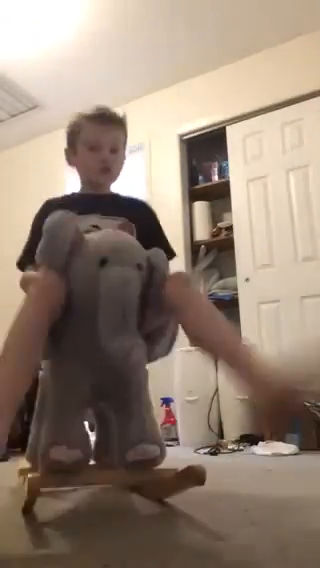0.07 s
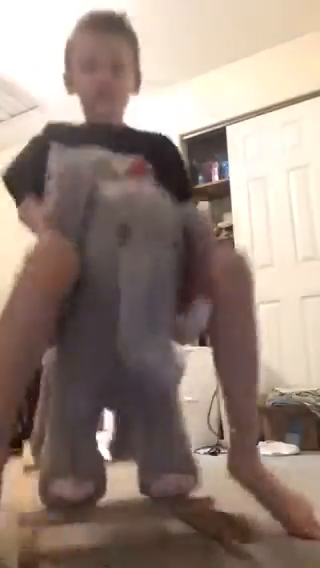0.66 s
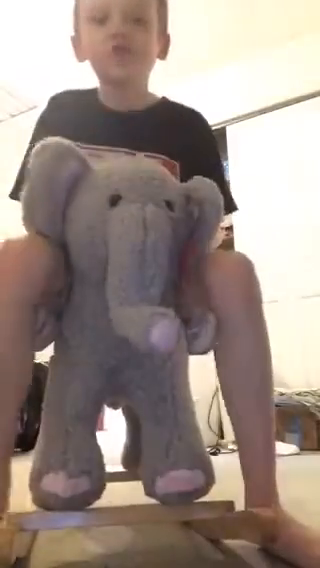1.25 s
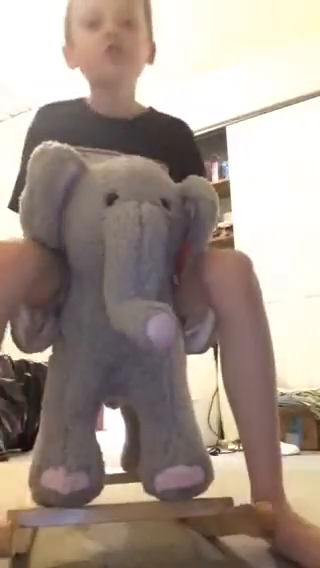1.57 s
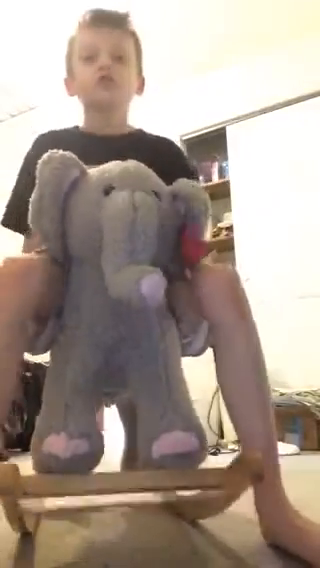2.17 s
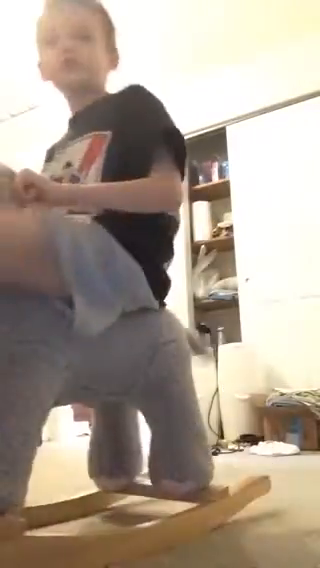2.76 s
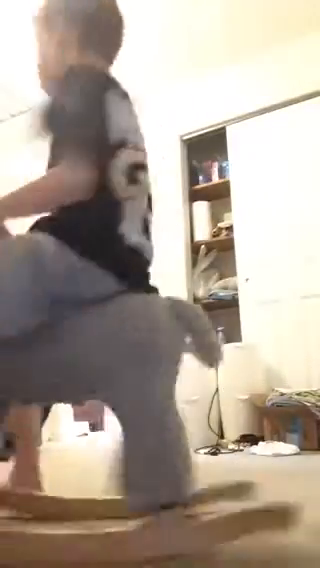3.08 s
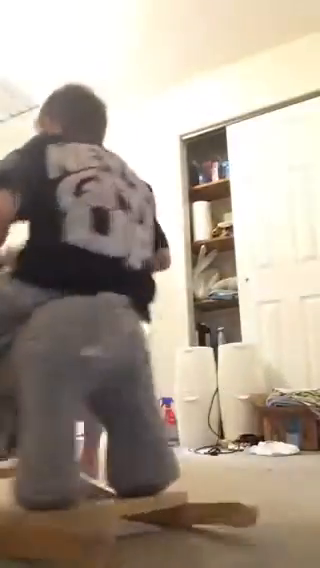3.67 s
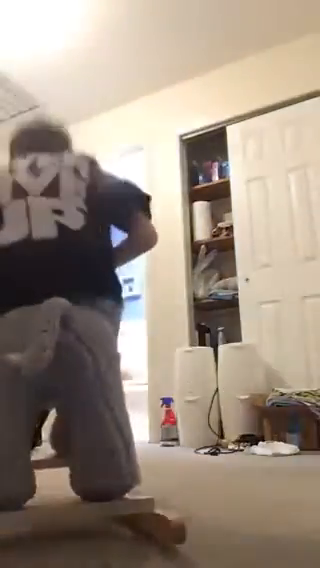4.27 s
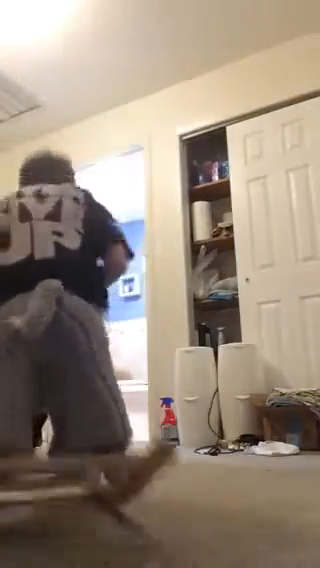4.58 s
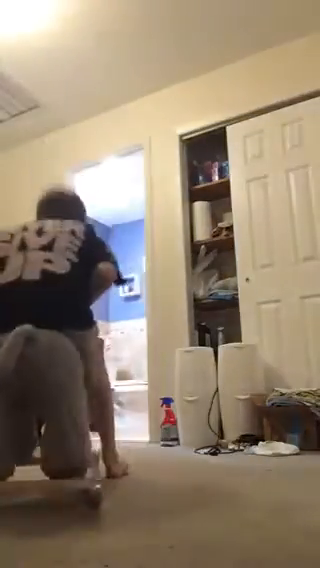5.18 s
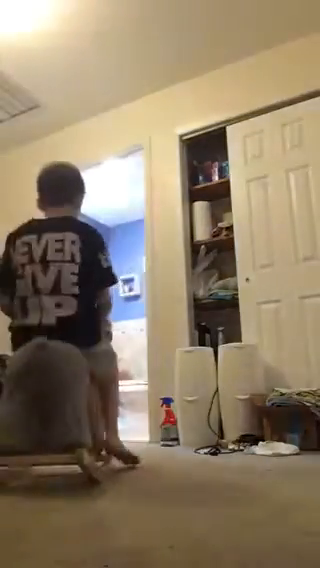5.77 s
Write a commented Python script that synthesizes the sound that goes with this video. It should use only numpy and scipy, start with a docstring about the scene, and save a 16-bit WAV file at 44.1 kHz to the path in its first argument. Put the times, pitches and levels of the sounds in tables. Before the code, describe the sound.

Wooden rockers of a plush ride-on toy thump irregularly on carpet, with soft scraping and cloth swishing in a small room.

```python
"""A small carpeted bedroom, one small microphone close to a child rocking and dragging a plush toy.
Wooden rockers and bare heels thump the floor and knock the toy's frame, and its joints tick.
The runners scrape through the pile; legs and cloth swish past the plush.
Behind them the room answers briefly, over the low rumble of the house."""
import sys
import numpy as np
from scipy import signal
from scipy.fft import rfft, irfft
from scipy.io import wavfile
from scipy.ndimage import uniform_filter1d

SR = 44100
rng = np.random.default_rng(int(sys.argv[2]) if len(sys.argv) > 2 else 0)


def transcribe(signal):
    """Save signal, clipped to [-1, 1], as a 16-bit WAV file at the path in sys.argv[1]."""
    frames = np.atleast_2d(signal).T
    limited = np.clip(frames, -1, 1)
    pcm = np.round(limited * 32767).astype(np.int16)
    wavfile.write(sys.argv[1], SR, pcm)


N = 266452
TIME = np.arange(N) / SR

# Rockers and heels landing: start_s, thud_db, thud_hz, knock_db, clack_db, rebound_gap_s, per_rebound_db
BLOWS = [(.061, -53, 117, -54, -44.5, 0.024, -22), (.383, -27, 68, -47, -65, 0.024, -19),
         (.405, -19, 58.6, -25, -55, .035, -14), (0.4122, -10.5, 95.2, -19, -25.5, 0.046, -13.5),
         (1.052, -43.5, 121, -41, -66, .05, -16), (1.472, -57, 111, -48.5, -72, .016, 0),
         (1.576, -96, 146, -71, -49, 0.01, -28), (1.953, -35, 79, -44.5, -49, 0.017, -5.5),
         (2.368, -72, 110, -44.5, -67, .02, -12), (2.413, -44, 92, -46, -66, 0.027, -6.5),
         (2.587, -24.5, 72.7, -43.5, -25, 0.033, -11.5), (2.817, -39, 82, -45, -52, .06, -23),
         (2.884, -36.5, 66, -63, -68, 0.022, -22), (2.902, -27, 56.6, -74, -77, .042, -18),
         (3.455, -42, 148, -46, -51, 0.048, -13), (5.091, -35.5, 122, -35, -44.5, 0.023, -6.5),
         (5.258, -50, 82.4, -49.5, -55, 0.037, -14), (5.700, -44.5, 205, -51, -47.5, .02, -13),
         (5.964, -38, 117, -37.5, -45.5, 0.032, -3)]
# Modes of the wooden frame, damped by plush and carpet: pitch_hz, relative_db, t60_s
FRAME_MODES = [(166, 3.5, 0.16), (206.6, 8.5, .08), (255, 2, .12), (318, -2.5, 0.16), (467, -4.5, 0.054),
               (495, -20.5, 0.035), (606, -7.5, 0.012), (1057, -31, .025)]
# Rolls and drags of the runners: start_s, length_s, relative_db, fade_db, fizz_offset_db
RUNNER_STROKES = [(0, 0.069, -53.5, 16, -1.5), (0.228, .07, -64.5, 4, -4), (0.487, 0.067, -52.5, 5.5, -9),
                  (0.61, 0.12, -64, 8, 2.5), (0.765, 0.41, -62, 8, -3), (1.326, 0.15, -67, 6.5, -9.5),
                  (2.04, 0.14, -75, 4.5, 1.5), (2.206, 0.3, -65, 3.5, -7.5),
                  (2.518, 0.19, -57.5, 9.5, -1.5), (2.864, 0.24, -62.5, 7.5, -1.5),
                  (3.103, 0.35, -62.5, 8.5, -0.5), (3.484, 0.59, -67.5, 2, -4.5),
                  (4.03, 0.62, -76.5, 0.5, -9), (4.237, 0.19, -67, 12.5, 5.5), (4.648, 0.35, -66.5, 3, 0.5),
                  (5.1, .18, -77, -10.5, -4.5), (5.34, 0.57, -68.5, 4.5, -7.5),
                  (5.87, 0.16, -76.5, -1, -11)]
# Tone of the carpet scrape as heard through the small microphone, with the microphone's treble peaks:
# frequency_hz, gain_db
SCRAPE_AT_MIC_SPECTRUM = [(100, -1.5), (220, 3), (400, 4), (680, 1.5), (950, -2), (1500, -4), (2200, -12),
                          (3250, -7), (4400, -20.5), (6050, -16), (7700, -23), (9000, -13), (10600, -22),
                          (12500, -17), (15500, -38)]
# Legs and cloth sliding on plush:
# start_s, rise_s, length_s, level_db, fade_db, treble_loss_db, resonance_hz, resonance_db, rub_db
SWISHES = [(0, 0.0017, 0.034, -57.5, 26, -12, 8900, -5, -2),
           (.215, 0.0042, 0.18, -59.5, 24, -12, 6120, -4, -28),
           (0.548, 0.015, 0.062, -64.5, 5, 3, 5970, 1, -17),
           (0.589, 0.025, 0.13, -50, 2.5, 10.5, 5940, -20, -17),
           (0.947, 0.025, .16, -52.5, 7.5, 15, 5090, -6.5, -13),
           (1.311, .003, .11, -78, -7, -7, 5100, 0, -6),
           (2.21, 0.0036, 0.12, -67.5, 2.5, -5, 5440, -5, 0.5),
           (2.303, 0.039, 0.031, -64.5, -7.5, 9, 4790, 5.5, 3.5),
           (2.514, 0.0042, .15, -51.5, 10, -16, 4680, -3, -1.5),
           (2.857, .025, 0.065, -58, 8, -26, 3640, -11, 9),
           (3.192, .02, 0.075, -69.5, 6, 10, 8600, -1, 8.5),
           (4.243, 0.025, 0.14, -78.5, 4, 0, 1370, 13, 12.5), (4.759, 0.011, 0.06, -67, 2, -2, 6030, 0, 3),
           (4.987, 0.016, 0.063, -83, 1, -5, 383, 20.5, 5), (5.093, .02, 0.095, -70, 1, 8, 3730, -6, -17),
           (5.498, 0.017, 0.33, -82, -6.5, -1, 3420, -7, 4)]
# Bright hiss of a swish: frequency_hz, gain_db
HISS_SPECTRUM = [(1000, -13.5), (3100, -16), (3600, -6), (4200, -20.5), (4750, 1), (5400, -3.5), (6200, 1),
                 (7100, -6), (8200, 0), (9200, -7.5), (10200, -12), (11500, -7), (13000, -18), (15000, -19),
                 (16000, -41)]
# Duller rub under the hiss: frequency_hz, gain_db
RUB_SPECTRUM = [(300, 13), (1200, 11), (2500, 8.5), (3500, 20.5), (4200, 12.5), (7000, -30), (9000, 16.5),
                (12500, -4), (15500, -4)]
# Joints slipping and cloth catching: start_s, peak_db
TICKS = [(.216, -54), (.436, -48), (0.498, -46), (1.315, -47.5), (1.578, -43), (1.594, -52), (1.955, -49.5),
         (2.091, -51), (2.213, -50), (2.512, -42), (2.826, -49), (2.851, -41.5), (3.044, -46), (3.435, -48),
         (4.419, -53), (5.095, -59), (5.701, -50.5), (5.967, -49.5)]
# Tone of a tick: frequency_hz, gain_db
TICK_SPECTRUM = [(300, 16), (900, 14.5), (2200, 4), (3500, 3.5), (6000, -0.5), (9500, 0.5), (15000, -9)]
# Decay of the bedroom's reflections: frequency_hz, t60_s
ROOM_DECAY = [(50, 0.43), (120, 0.19), (300, 0.38), (700, 0.12), (3000, 0.37), (12000, 0.24)]
# Room tone of the quiet house: frequency_hz, gain_db
ROOM_TONE_SPECTRUM = [(20, -27), (35, -7.5), (50, 6), (80, -1), (115, 7), (170, -9.5), (280, -8),
                      (500, -18.5), (1000, -18.5), (2200, -27.5), (3300, -27), (5000, -31), (9500, -31),
                      (15500, -39.5)]


def blows(place_spread_db=5.5, landings=3, knock_hz=258.4, clack_hz=495, clack_lag_s=0.00311):
    """Each blow moves floor and frame, then rebounds; where it lands shifts the mix of modes."""
    out = np.zeros(N)
    places_db = place_spread_db * rng.standard_normal((len(BLOWS), landings, len(FRAME_MODES)))
    for blow, mixes_db in zip(BLOWS, places_db):
        start, thud_db, thud_hz, knock_db, clack_db, gap, per_rebound_db = blow
        thud = amp(thud_db) * padded_push(thud_hz, cycles=0.97, swell=1.52)
        # The pile is squashed first; then the runner meets the hard floor under it.
        add(out, start + clack_lag_s, amp(clack_db) * frame_knock(clack_hz, mixes_db[0]))
        for rebound, mix_db in enumerate(mixes_db):
            # A rebound lands softer, so its knock fades faster than its thud.
            wood = amp(knock_db - 1.5 * rebound) * frame_knock(knock_hz, mix_db)
            add(out, start + rebound * gap, amp(rebound * per_rebound_db) * (thud + wood))
    return out


def padded_push(hz, cycles, swell):
    """A padded contact gives way and swings back for a cycle or two; its speed is what radiates."""
    turns = hz * TIME[:SR // 4]
    displacement = -np.cos(2 * np.pi * turns) * turns ** swell * np.exp(-(turns / cycles) ** 2)
    return unit_peak(np.gradient(displacement))


def frame_knock(hz, mix_db, ring_db=-4):
    """The short push of wood on the floor sets the nearest modes of the frame ringing."""
    t = TIME[:SR // 4]
    drive = padded_push(hz, cycles=1.236, swell=1.98)
    modes = [amp(db + shift_db - 60 * t / t60) * np.sin(2 * np.pi * mode_hz * t)
             for (mode_hz, db, t60), shift_db in zip(FRAME_MODES, mix_db)]
    frame = sum(modes[::2]) - sum(modes[1::2])  # neighbouring modes swing opposite ways
    ring = signal.fftconvolve(drive, frame)[:len(t)]
    return unit_peak(drive + amp(ring_db) * unit_peak(ring))


def carpet_scrape(body_gain_db=3.5, flutter_db=1.3, tuft_db=2.5, split_hz=4500):
    """The runners plough through the pile; dragged along, they also make the fibres fizz."""
    body_db, fizz_db = friction_levels()
    grain = colour(fibres(per_s=7000, spread_db=-0.5), SCRAPE_AT_MIC_SPECTRUM)
    spectra = signal.stft(grain, SR, nperseg=512)[2]
    tufts = amp(tuft_db * patches(spectra.shape, bins=4, frames=7))  # each tuft has its own colour
    scrape = signal.istft(spectra * tufts, SR, nperseg=512)[1][:N]
    body = unit_rms(butterworth(scrape, split_hz, "low")) * amp(body_db + body_gain_db)
    fizz = unit_rms(butterworth(scrape, split_hz, "high")) * amp(fizz_db)
    return body * amp(flutter_db * wander(29)) - fizz * amp(flutter_db * wander(27))


def friction_levels(crush_rise_s=0.0071, crush_t60_s=0.22, crush_fizz_db=-5):
    """Relative dB of scrape and fizz: the strokes, the pile crushed by each blow and a stir at rest."""
    body_power, fizz_power = amp(-81) ** 2, amp(-85.5) ** 2  # the runners never lie quite still
    for start, length, db, fade_db, fizz_offset_db in RUNNER_STROKES:
        stroke = amp(db) * runner_pressure(start, length, fade_db)
        body_power += stroke ** 2
        fizz_power += (amp(fizz_offset_db) * stroke) ** 2
    for start, _, _, knock_db, *_ in BLOWS:
        since = TIME - start
        crush_db = -54 + 0.28 * knock_db  # a harder knock crushes the pile more loudly
        decay_db = 60 * np.clip(since / crush_t60_s, 0, 2)
        crush = np.clip(since / crush_rise_s, 0, 1) * amp(crush_db - decay_db)
        body_power += crush ** 2
        fizz_power += (amp(crush_fizz_db) * crush) ** 2
    return 10 * np.log10(body_power), 10 * np.log10(fizz_power)


def runner_pressure(start, length, fade_db, rise_s=0.023, fall_s=0.025):
    """Pressure of one stroke: it builds, fades or swells, and lets go."""
    since = TIME - start
    build = (1 + np.tanh(since / (2 * rise_s))) / 2
    release = (1 + np.tanh((length - since) / (2 * fall_s))) / 2
    return build * release * amp(-fade_db * np.clip(since / length, 0, 1))


def cloth_swishes(fall_s=0.034, flutter_db=-0.5, width_hz=480, ripple_db=4.5, treble_hz=8000):
    """Quick slides on plush: a resonant hiss over a duller rub, its level and treble shifting."""
    out, t = np.zeros(N), TIME[:SR // 2]
    grain = fibres(per_s=20000, spread_db=0.5) * amp(flutter_db * wander(78))
    rub = unit_rms(colour(fibres(per_s=9800, spread_db=2.0), RUB_SPECTRUM))
    for start, rise, length, db, fade_db, treble_loss_db, resonance_hz, resonance_db, rub_db in SWISHES:
        first = round(start * SR)
        span = slice(first, first + len(t))
        hz, frame_s, slide = signal.stft(grain[span], SR, nperseg=512)
        hz, progress = hz[:, None], np.minimum(frame_s / length, 1)
        # The moving leg combs the sound.
        slide = slide * amp(ripple_db * patches(slide.shape, bins=4, frames=14))
        treble_share = np.clip(2 * np.log2(hz / treble_hz) + 1, 0, 1)
        tilt = amp(treble_loss_db * (0.5 - progress) * treble_share)
        hiss = unit_rms(amp(curve_at(HISS_SPECTRUM, hz))) * tilt
        resonance = amp(resonance_db) * unit_rms(1 / (1 + (2 * (hz - resonance_hz) / width_hz) ** 2))
        bright = signal.istft(slide * np.hypot(hiss, resonance), SR, nperseg=512)[1][:len(t)]
        edges = np.clip(t / rise, 0, 1) * np.clip((length - t) / fall_s + 0.5, 0, 1)
        level = amp(db - fade_db * np.minimum(t / length, 1))
        add(out, start, level * edges * (bright + amp(rub_db) * rub[span]))
    return out


def fibres(per_s, spread_db):
    """Countless fibres catch and let go: tiny clicks of uneven size."""
    size = amp(spread_db * np.minimum(rng.exponential(1, N), 4))
    return unit_rms(rng.standard_normal(N) * size * (rng.random(N) < per_s / SR))


def joint_ticks(t60_s=0.029):
    """Joints slip and cloth catches with a short dry crack."""
    out, t = np.zeros(N), TIME[:SR // 20]
    for start, peak_db in TICKS:
        crack = colour(rng.standard_normal(len(t)), TICK_SPECTRUM) * amp(-60 * t / t60_s)
        add(out, start, amp(peak_db) * unit_peak(crack))
    return out


def bedroom_reflections(direct, delay_s=0.009):
    """Dense reflections reach the microphone just after the direct sound; each band dies at its rate."""
    hz, t, spectra = signal.stft(rng.standard_normal(SR // 2), SR, nperseg=512)
    decay = amp(-60 * t / curve_at(ROOM_DECAY, hz)[:, None])
    tail = signal.istft(spectra * decay, SR, nperseg=512)[1]
    out = np.zeros(N)
    add(out, delay_s, signal.fftconvolve(direct, tail / np.linalg.norm(tail)))
    return out


def room_tone(level_db=-63.5):
    """Low steady rumble of the house with a faint hiss."""
    return amp(level_db) * unit_rms(colour(rng.standard_normal(N), ROOM_TONE_SPECTRUM))


def amp(db):
    return 10 ** (np.asarray(db) / 20)


def unit_rms(x):
    return x / np.sqrt(np.mean(x ** 2) + 1e-20)


def unit_peak(x):
    return x / abs(x).max()


def butterworth(x, hz, kind):
    return signal.sosfilt(signal.butter(2, hz, kind, fs=SR, output="sos"), x)


def curve_at(points, hz):
    """Value at hz of points joined by straight lines on a log-frequency axis."""
    point_hz, values = np.transpose(points)
    return np.interp(np.log(hz + 1), np.log(point_hz + 1), values)


def colour(x, spectrum):
    """Filters x by a table of gains."""
    hz = np.fft.rfftfreq(len(x), 1 / SR)
    return irfft(rfft(x) * amp(curve_at(spectrum, hz)), len(x))


def add(mix, start_s, sound):
    part = mix[max(round(start_s * SR), 0):][:len(sound)]
    part += sound[:len(part)]


def wander(rate_hz):
    """Random drift of unit size, up to about the given rate."""
    hz = np.fft.rfftfreq(N, 1 / SR)
    return unit_rms(irfft(rfft(rng.standard_normal(N)) * np.exp(-(hz / rate_hz) ** 2), N))


def patches(shape, bins, frames):
    """Ridges and hollows of unit size that drift through a short-time spectrum."""
    ridges = uniform_filter1d(rng.standard_normal(shape), bins, axis=0)
    return unit_rms(uniform_filter1d(ridges, frames, axis=1))


def scene(thump_room_db=-13, rustle_room_db=-11):
    """Thumps and rustles close up, in mono, with the bedroom well behind them."""
    thumps = blows()
    rustle = joint_ticks() + cloth_swishes() + carpet_scrape()
    reflections = bedroom_reflections(amp(thump_room_db) * thumps + amp(rustle_room_db) * rustle)
    return (thumps + rustle + reflections + room_tone())[None]


def record(dry, low_cut_hz=36, high_cut_hz=15700):
    """The small microphone loses the deepest bass, and the top of the treble is cut off steeply."""
    thin = butterworth(dry, low_cut_hz, "high")
    band_limit = signal.firwin(511, high_cut_hz, window=("kaiser", 9), fs=SR)
    return signal.oaconvolve(thin, band_limit[None], "same")


dry = scene()
out = record(dry)
transcribe(out)
```